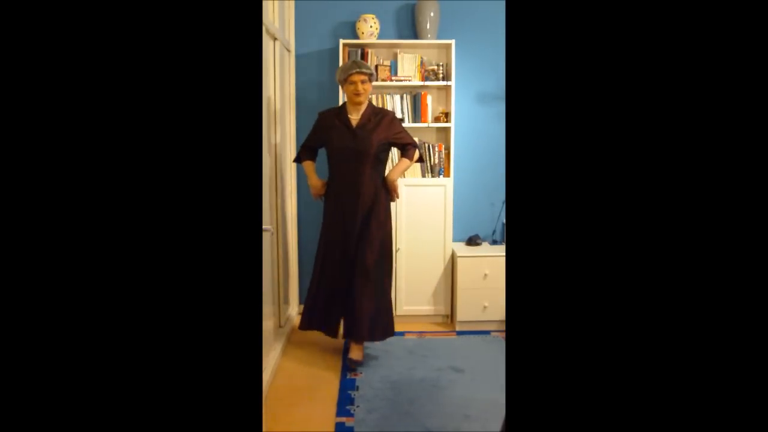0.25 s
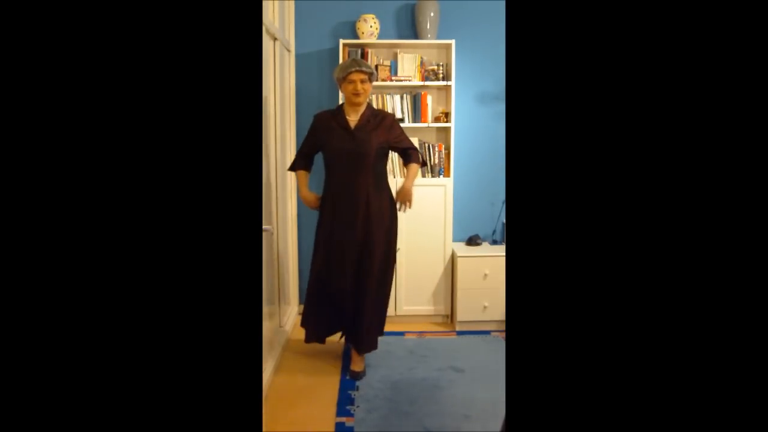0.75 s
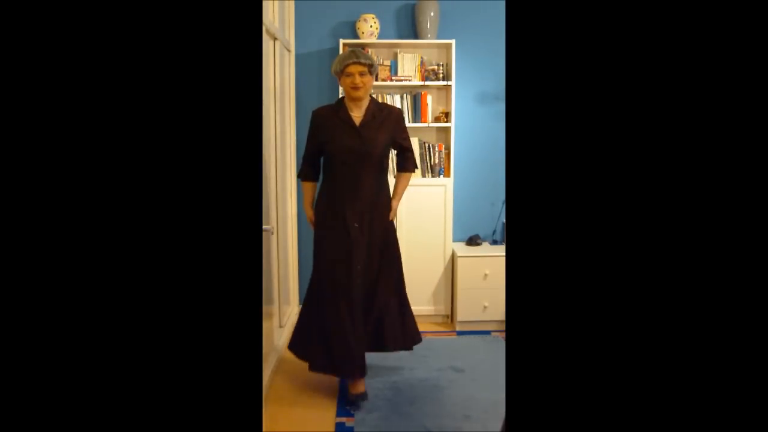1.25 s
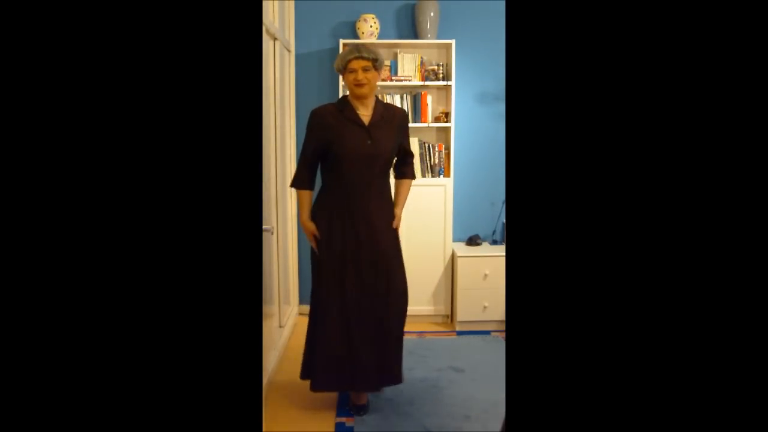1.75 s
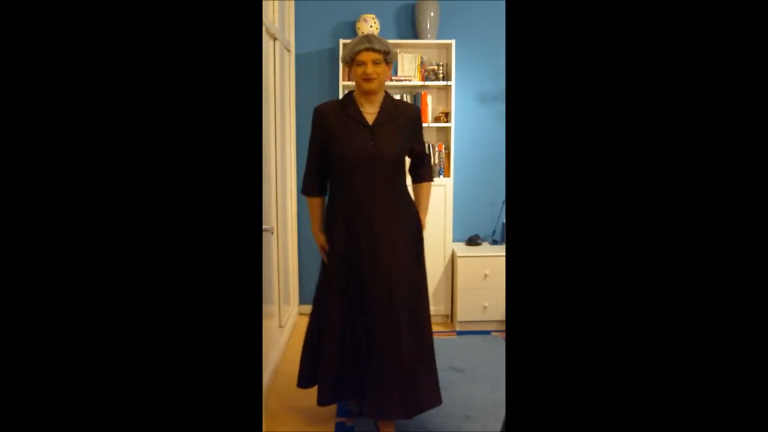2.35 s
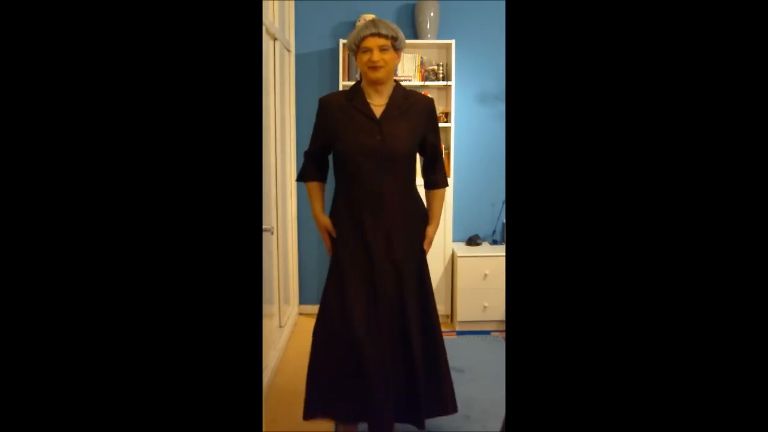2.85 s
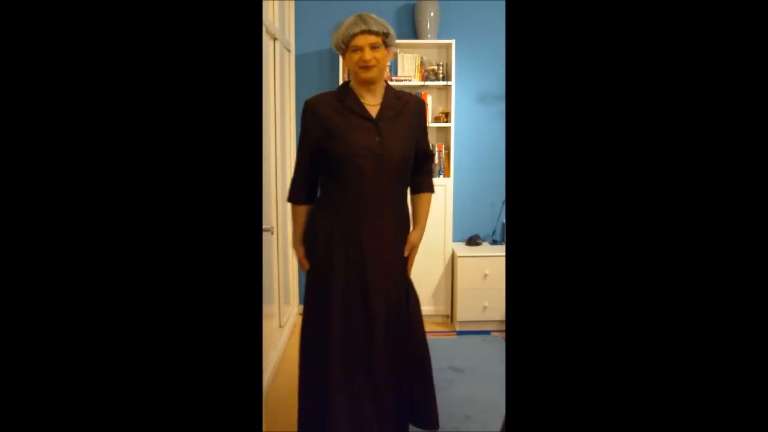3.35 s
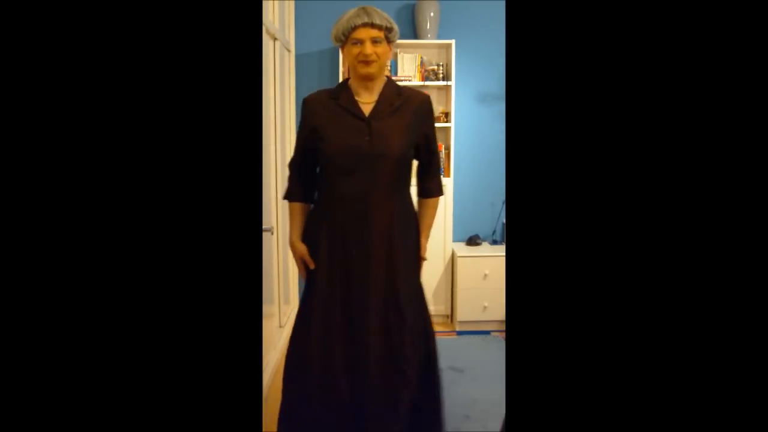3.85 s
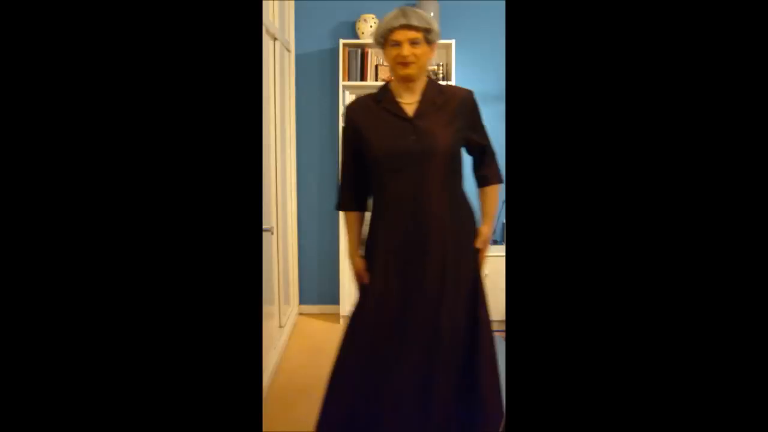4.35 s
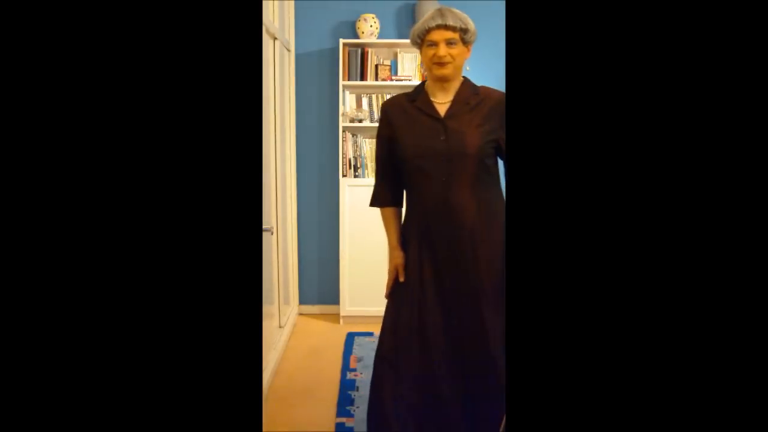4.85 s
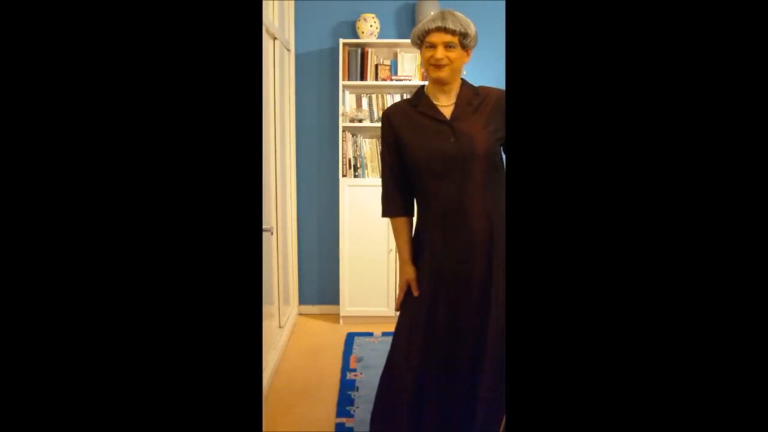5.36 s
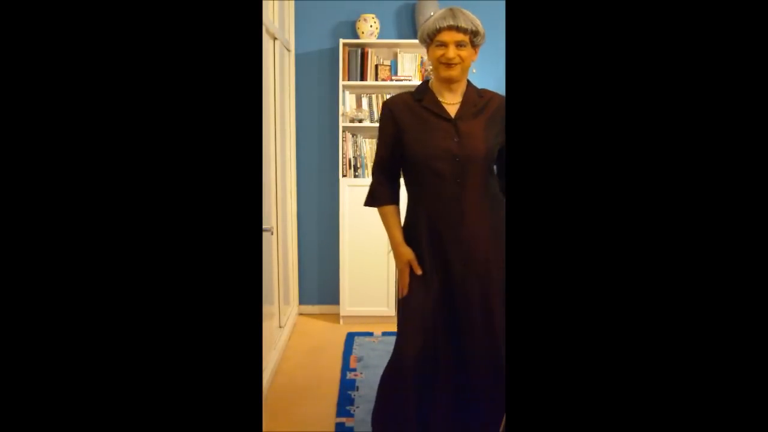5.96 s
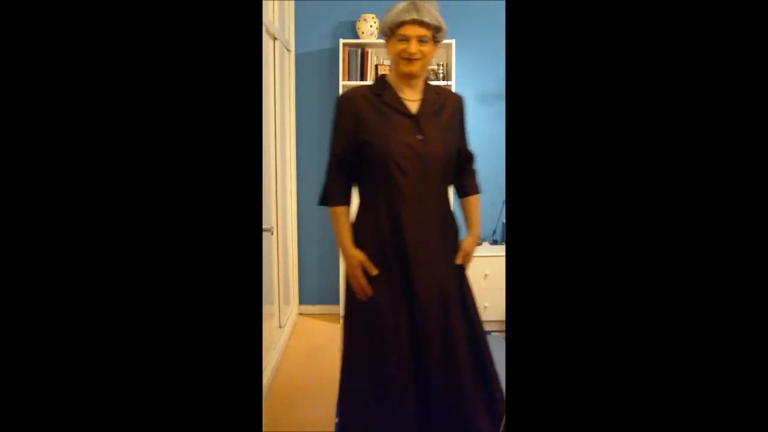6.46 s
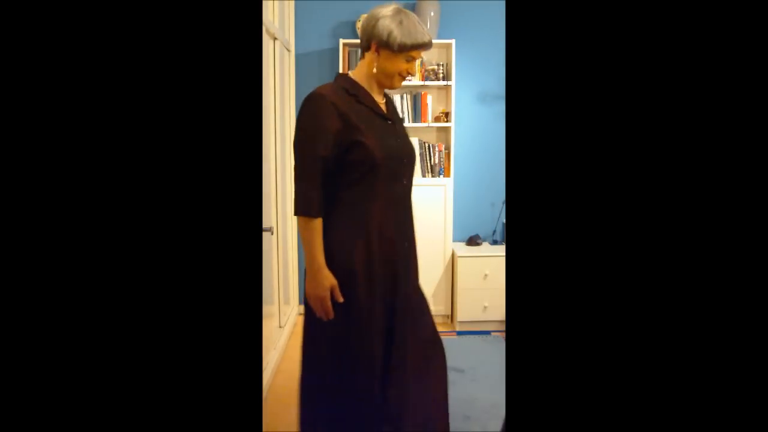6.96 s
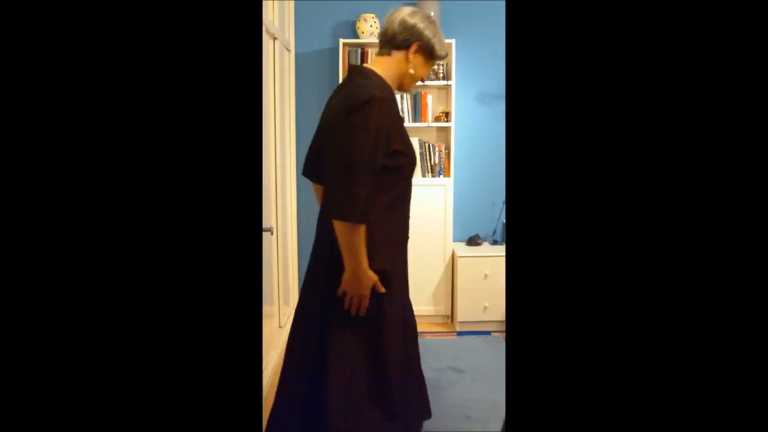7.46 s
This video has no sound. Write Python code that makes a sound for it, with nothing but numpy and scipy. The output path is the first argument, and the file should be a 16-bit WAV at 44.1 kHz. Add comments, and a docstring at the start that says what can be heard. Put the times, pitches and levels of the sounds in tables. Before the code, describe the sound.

In a small furnished room, a long stiff dress begins with soft rustling, then swishes more strongly as the wearer walks closer. Bright sliding weave mixes with lower papery folds and fine crinkling. The loudest swishes, with sharp dry fabric snaps, come a little past three seconds; then it eases, and separate swishes continue through swaying and turning. Close stereo pickup, short room reflections, faint constant hiss.

```python
"""A soft rustle over a faint steady hiss comes first; then a long taffeta dress swishes in a small room
as its wearer walks up, sways and turns. Sliding weave is bright noise whose level follows cloth speed;
flexing folds are a lower noise. Random clicks make the crinkle, bursts of slips the taut snaps, both
with reverberation, and independent noise in two microphones makes the hiss."""
import sys
import numpy as np
from scipy import signal
from scipy.fft import rfft, irfft
from scipy.io import wavfile

SR = 44100
rng = np.random.default_rng(int(sys.argv[2]) if len(sys.argv) > 2 else 0)


def digitize_waveform(pressure):
    """Quantize a signal to 16-bit integers and store it at the path in sys.argv[1].

    Rows of a 2-D input are taken as channels; values are limited to [-1, 1].
    """
    field = np.atleast_2d(pressure).T
    bounded = np.clip(field, -1, 1)
    quanta = np.round(bounded * 32767).astype(np.int16)
    wavfile.write(sys.argv[1], SR, quanta)


N = 340011  # samples
SIZE, HOP = 1024, 256  # short-time Fourier frame and step, samples
HZ = np.fft.rfftfreq(SIZE, 1 / SR)
FRAME_S = np.arange(N // HOP + 5) * HOP / SR

# swings of the skirt or an arm: start t/s, length/s, moment of top speed (share of length, 0-1),
# then relative levels: sliding weave level/dB, flexing folds level/dB, sheen of fast sliding level/dB
SWISHES = [(0.312, 0.19, 0.1, -50, -61.0, -55), (0.458, 0.25, 0.62, -50.5, -52, -51),
           (0.63, 0.26, 0.15, -47, -60, -54), (1.05, 0.4, 0.72, -45, -55, -46.5),
           (1.41, 0.21, 0.27, -47.5, -53.5, -62), (1.502, 0.45, 0.76, -44.0, -51, -43.5),
           (2.131, 0.52, 0.5, -43, -54.5, -42.5), (2.6, 0.29, 0.53, -45, -57.5, -45.5),
           (2.899, 0.38, 0.43, -41, -53, -42.5), (3.307, 0.33, 0.59, -39, -50, -38),
           (3.567, 0.26, 0.21, -42, -54, -42.5), (4.24, 0.36, 0.24, -48, -68, -48.5),
           (4.54, 0.17, 0.56, -46, -69, -44), (4.65, 0.47, 0.23, -44, -67, -44.5),
           (5.108, 0.28, 0.83, -44.5, -70, -45), (5.41, 0.27, 0.45, -49, -71, -42.5),
           (5.55, 0.31, 0.43, -44, -55.5, -48), (5.991, 0.13, 0.26, -51, -51.5, -52),
           (6.08, 0.43, 0.18, -42.5, -53.5, -42), (6.215, 0.35, 0.9, -46.5, -56.5, -43),
           (6.523, 0.24, 0.2, -53.5, -53.5, -50.5), (6.8, 0.15, 0.2, -46.5, -74, -49),
           (7.03, 0.29, 0.42, -49, -59, -49.0), (7.294, 0.34, 0.74, -44.5, -56.0, -43.5)]
# stirring between swishes: t/s, flexing folds relative level/dB, sliding weave relative level/dB
STIRRING = [(0.0, -60.5, -52.5), (0.25, -59.5, -54), (0.55, -56.5, -51.5), (1.6, -57.5, -47.2),
            (2.9, -53.5, -48), (3.9, -53.5, -47.5), (5.9, -57.5, -47), (7.0, -54.5, -49), (7.7, -54.5, -44)]
# ribs zipping over each other, a brief pitched crest: t/s, length/s, f/Hz, width/Hz, lift level/dB
RIB_ZIPS = [(0.63, .16, 2100, 700, 6), (2.115, 0.082, 4300, 1200, 6), (3.60, 0.3, 4000, 380, 6),
            (4.30, 0.27, 4350, 700, 3.5), (5.22, 0.3, 2470, 130, 10.5), (5.32, 0.11, 5800, 1300, 3.5),
            (5.53, .14, 13250, 350, 8), (6.158, .2, 2130, 400, 5.5), (6.445, 0.15, 3280, 400, 6)]
# folds snapping taut: t/s, relative level/dB, decay time of the giving cloth/s
TAUT_SNAPS = [(0.522, -42, .004), (1.128, -34.5, .004), (2.356, -28.5, 0.0037), (3.1667, -20.5, 0.0018),
              (3.187, -27.5, .005), (3.3386, -18, 0.0018), (3.3437, -19, 0.0026), (6.018, -34.5, 0.0051),
              (6.165, -30, 0.0033), (6.694, -28, 0.0034)]
# spectrum of sliding weave: f/Hz, relative density level/dB
WEAVE_SPECTRUM = [(100, -62), (500, -27.5), (1200, -12), (2200, -3.5), (3300, -3), (4050, 0), (4700, -0.15),
                  (5900, 1.5), (7500, -1), (8400, 0), (9200, 2), (11700, 2.5), (13600, -2), (15300, -4)]
# spectrum of flexing folds: f/Hz, relative density level/dB
FOLD_SPECTRUM = [(85, -58), (150, -28), (220, -25.5), (350, -20.5), (500, -9.5), (700, -3), (1100, 0.5),
                 (1800, 0), (2600, 0), (4200, -6), (7000, -23), (15000, -32)]
# spectrum of creases and snaps: f/Hz, relative density level/dB
SNAP_SPECTRUM = [(60, -43), (200, -34), (550, -10), (1100, 2.5), (2400, 2.5), (4500, 0.5), (6500, -7),
                 (15000, -15)]
# spectrum of the quiet hiss: f/Hz, relative density level/dB
QUIET_SPECTRUM = [(25, -11), (45, -28), (85, -43), (160, -11), (300, -0.5), (700, 8.5), (2000, 0.5),
                  (6000, -0.5), (11000, 5.5), (15000, -5.5)]
# likeness of the two microphones: f/Hz, coherence (0-1)
COHERENCE = [(100, .12), (350, .28), (650, .7), (1100, .85), (1700, .88), (2600, .97), (4400, .91),
             (6400, .35), (8200, .26), (9200, .44), (10300, .27), (11700, .3), (13500, .08)]
# balance of the microphones: f/Hz, left over right level/dB
BALANCE = [(3000, -0.04), (6500, -1.1), (9500, -1.5), (15000, -1.4)]
# reverberation time of the room: f/Hz, time to fall by 60 dB/s
ROOM_T60 = [(200, 0.25), (2000, 0.31), (6000, 0.43), (15000, .15)]

RING_HZ, RING_WIDTH_HZ, RING_DB = 2380, 92, 0.5  # a hollow ring in the rustle
SPEED_LAW = 0.82  # amplitude grows as this power of the cloth's speed
STIR_SHEEN_DB = -1.8  # sheen of the stirring, relative to its sliding
NOTCH_HZ, EDGE_HZ = 8000, 15320


def weave(level_db=5.0, sheen_share=0.86, sheen_hz=8500, patchy_db=0.55, grain_db=2.0, flutter_db=.45):
    """Friction noise: threads scrape over threads, and the treble follows the sheen of fast sliding."""
    _, slide_db, sheen_db = motion(FRAME_S)
    treble_share = (1 / (1 + (sheen_hz / (HZ + 1)) ** 6))[:, None]
    bright_db = treble_share * (sheen_db - slide_db) * sheen_share
    # random patches over time and pitch make the noise uneven
    uneven_db = patchy_db * patches(0.039, 660) + grain_db * patches(0.033, 50)
    uneven_db = uneven_db + flutter_db * flutter()
    level = gain_of(level_db + slide_db + bright_db + uneven_db + zips())
    return hiss(colour(WEAVE_SPECTRUM)[:, None] * ring() * level, likeness())


def zips():
    """Periodic excitation: ribs catching at a steady speed lift a narrow band, in dB (bins x frames)."""
    lift_db = 0
    for s, length, hz, width, db in RIB_ZIPS:
        band = 1 / (1 + (2 * (HZ - hz) / width) ** 4)
        envelope = np.exp(-(2 * (FRAME_S - s) / length) ** 2)
        lift_db = lift_db + db * np.outer(band, envelope)
    return lift_db


def flutter(span_s=0.037):
    """Stick-slip: cloth catches and lets go, a quick random waver of rms 1 shared by all pitches."""
    bell = np.exp(-.5 * (2 * np.arange(-40, 41) * HOP / SR / span_s) ** 2)
    return evened(np.convolve(rng.standard_normal(len(FRAME_S)), bell, "same"))


def folds(level_db=3.0, patchy_db=1.0, grain_db=2.0):
    """Bending and contact noise: broad folds flex and brush each other in a lower, papery rush."""
    flex_db = motion(FRAME_S)[0]
    uneven_db = patchy_db * patches(0.019, 900) + grain_db * patches(0.058, 60)
    level = gain_of(level_db + flex_db + uneven_db)
    return hiss(colour(FOLD_SPECTRUM)[:, None] * ring() * level, likeness())


def ring():
    """Resonance: the gain of one hollow mode against frequency."""
    detuning = 2 * (HZ - RING_HZ) / RING_WIDTH_HZ
    return gain_of(RING_DB / (1 + detuning ** 2))[:, None]


def likeness(growth=2.6, usual_db=-45):
    """Level-dependent coherence: the two channels grow more alike as the sliding noise gets louder."""
    same = np.clip(read(COHERENCE), 0, 1)[:, None]
    excess_db = motion(FRAME_S)[1] - usual_db
    return np.maximum(1 - (1 - same) * gain_of(-growth * same ** 2 * excess_db), 0)


def motion(t):
    """Power addition: swishes add to the stirring; returns flexing, sliding and sheen in dB at times t."""
    s, *columns = np.transpose(STIRRING)
    flex, slide = [np.interp(FRAME_S, s, c) for c in columns]
    power = gain_of([flex, slide, slide + STIR_SHEEN_DB]) ** 2
    for start, length, crest, slide_db, flex_db, sheen_db in SWISHES:
        envelope = swing(FRAME_S, start, length, crest) ** SPEED_LAW
        power = power + np.outer(gain_of([flex_db, slide_db, sheen_db]), envelope) ** 2
    return [np.interp(t, FRAME_S, 10 * np.log10(p)) for p in power]


def swing(t, start, length, crest):
    """Kinematics of a swing: speed (0-1) gathers from rest to its crest and slows to rest again."""
    u, crest = np.clip((t - start) / length, 0, 1), np.clip(crest, .05, .95)
    return np.sin(np.pi / 2 * np.minimum(u / crest, (1 - u) / (1 - crest)))


def crinkle(crease_db=-8.0, prickle_db=-9):
    """Impulsive buckling: creases tick as folds flex; finer prickles ride on the sliding weave."""
    flex_db, slide_db, _ = motion(np.arange(N) / SR)
    creases = buckles(per_s=170, spread_db=3.5) * gain_of(crease_db + flex_db)
    prickles = np.array([buckles(per_s=700, spread_db=2.5) for _ in range(2)])
    prickles = prickles * gain_of(prickle_db + slide_db)
    ticks = struck(np.array([creases, creases]), SNAP_SPECTRUM)
    return room(ticks + struck(prickles, WEAVE_SPECTRUM), wet_db=-6.0)


def buckles(per_s, spread_db):
    """Poisson-like process: a random train of tiny clicks, most small and a few large, rms 1."""
    size = gain_of(spread_db * np.minimum(rng.exponential(1, N), 3))
    occurs = rng.random(N) < per_s / SR
    return evened(size * rng.choice([-1, 1], N) * occurs)


def snaps(level_db=-8.3):
    """Sudden tension: a fold pulls taut in a decaying burst of slips lasting a few milliseconds."""
    t, slips = np.arange(SR // 50) / SR, np.zeros(N)
    for s, db, give_s in TAUT_SNAPS:
        burst = rng.choice([-1, 1], len(t)) * np.exp(-t / give_s)
        slips[round(s * SR):][:len(t)] += gain_of(level_db + db) * burst
    return room(struck(np.array([slips, slips]), SNAP_SPECTRUM), wet_db=0.5)


def room(x, wet_db, early_s=0.02, early_db=-1):
    """Reverberation: direct sound, a quick cluster off near walls and cupboards, a short diffuse tail."""
    early = gain_of(early_db) * np.exp(-FRAME_S / early_s) / np.sqrt(early_s)
    t60 = read(ROOM_T60)[:, None]
    late = gain_of(-60 * FRAME_S / t60) * np.sqrt(np.log(1000) / t60)
    tail = hiss(np.hypot(early, late), read(COHERENCE)[:, None])[:, :SR // 2]
    tail = tail / np.linalg.norm(tail[0])
    return x + gain_of(wet_db) * signal.fftconvolve(x, tail, axes=1)[:, :N]


def quiet(level_db=-57):
    """Incoherent noise: a steady hiss, unrelated at the two microphones."""
    return hiss(gain_of(level_db) * colour(QUIET_SPECTRUM)[:, None], same=0)


def hiss(gains, same):
    """Filtered noise: gains (bins x frames) shape it; same is the coherence of the microphones."""
    noise = rng.standard_normal((2, (len(FRAME_S) - 1) * HOP))
    a, b = signal.stft(noise, nperseg=SIZE, noverlap=SIZE - HOP)[2]
    same = np.clip(same, -1, 1)
    mid, side = a * np.sqrt((1 + same) / 2), b * np.sqrt((1 - same) / 2)
    pair = np.array([mid + side, mid - side]) * gains
    return signal.istft(pair, nperseg=SIZE, noverlap=SIZE - HOP)[1][:, :N]


def struck(clicks, points):
    """Minimum phase: clicks take on a spectrum with a sharp start and no sound ahead of it."""
    log_gain = np.log(colour(points) + 1e-5)
    circle = np.concatenate([log_gain, log_gain[-2:0:-1]])
    pulse = np.fft.ifft(np.exp(np.conj(signal.hilbert(circle)))).real
    return signal.oaconvolve(clicks, pulse[None], axes=1)[:, :N]


def patches(span_s, span_hz):
    """Smoothed randomness: a field over frequency and time, rms 1, with patches of the given size."""
    field = rng.standard_normal((len(HZ), len(FRAME_S)))
    for axis, span in enumerate([span_hz * SIZE / SR, span_s * SR / HOP]):
        bell = np.exp(-.5 * (2 * np.arange(-40, 41) / span) ** 2)
        field = signal.fftconvolve(field, np.expand_dims(bell, 1 - axis), "same", axes=axis)
    return evened(field)


def colour(points):
    """Power normalisation: a spectrum as gains that keep the power of white noise."""
    return evened(gain_of(read(points)))


def read(points, hz=HZ):
    """Logarithmic pitch scale: interpolates a table on a log-frequency axis."""
    f, value = np.transpose(points)
    return np.interp(np.log(hz + 1), np.log(f + 1), value)


def evened(x):
    """Root-mean-square normalisation: scales to rms 1."""
    return x / np.sqrt(np.mean(x ** 2) + 1e-20)


def gain_of(db):
    """Decibel law: level to amplitude."""
    return 10 ** (np.asarray(db) / 20)


def scene():
    """Superposition: the sounds of the dress in the room and the hiss add."""
    return weave() + folds() + crinkle() + snaps() + quiet()


def record(dry):
    """Linear filtering: a slightly brighter right microphone, a narrow notch and a steep band limit."""
    hz = np.fft.rfftfreq(N, 1 / SR)
    balance = gain_of(np.array([[.5], [-.5]]) * read(BALANCE, hz))
    balanced = irfft(rfft(dry) * balance, N)
    notched = signal.lfilter(*signal.iirnotch(NOTCH_HZ, 70, fs=SR), balanced)
    low_pass = signal.firwin(1023, EDGE_HZ, window=("kaiser", 9), fs=SR)
    return signal.oaconvolve(notched, low_pass[None], "same")


dry = scene()
out = record(dry)
digitize_waveform(out)
```